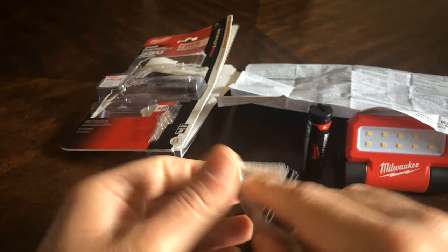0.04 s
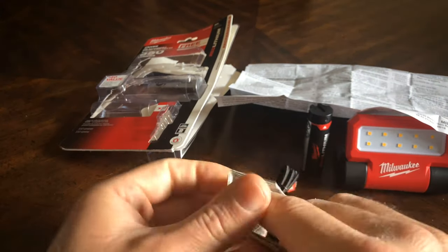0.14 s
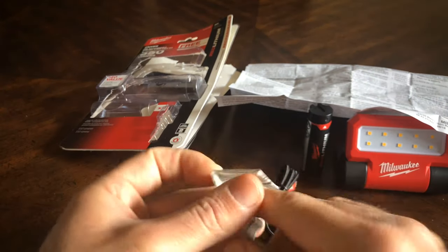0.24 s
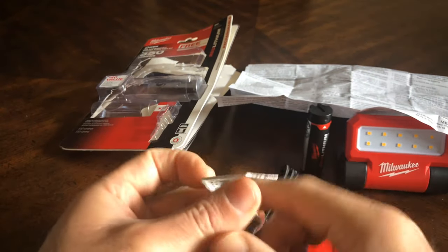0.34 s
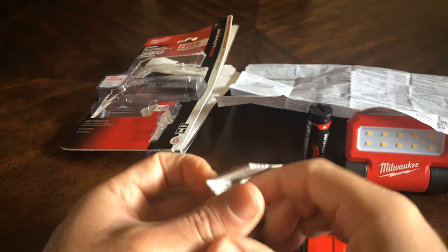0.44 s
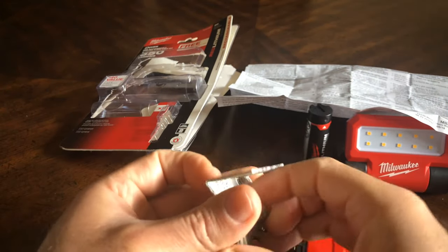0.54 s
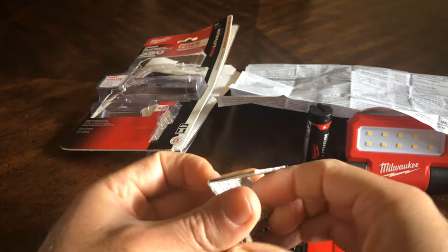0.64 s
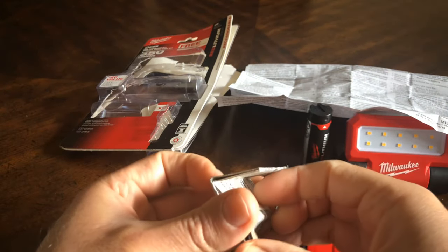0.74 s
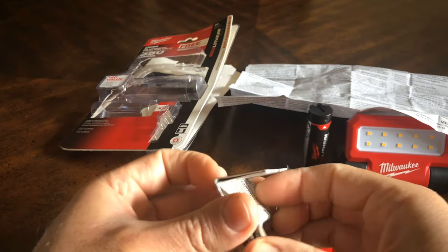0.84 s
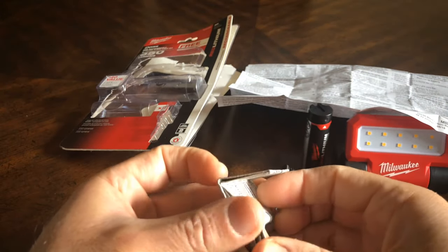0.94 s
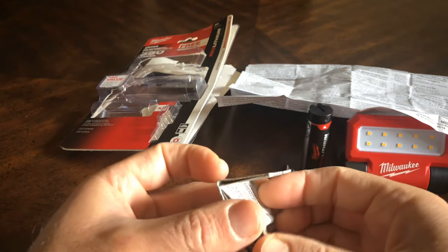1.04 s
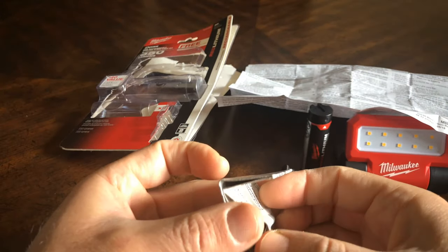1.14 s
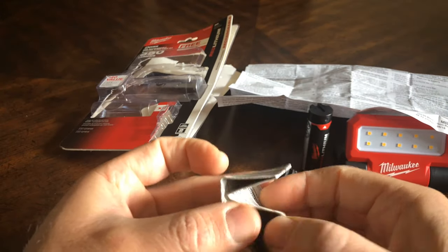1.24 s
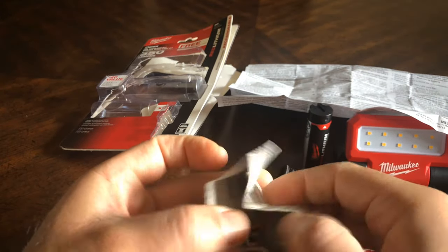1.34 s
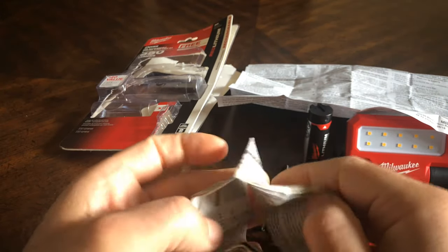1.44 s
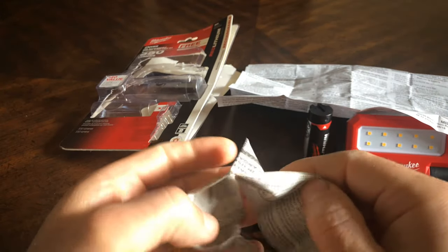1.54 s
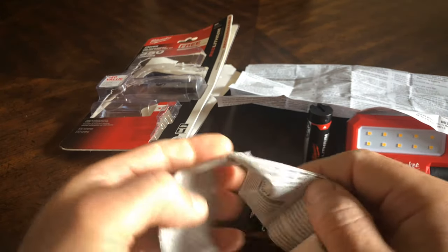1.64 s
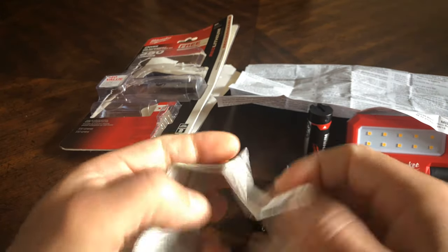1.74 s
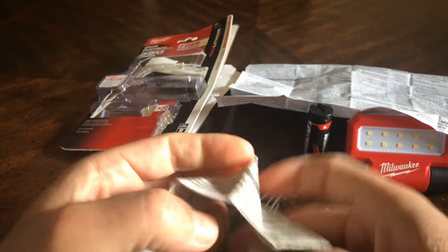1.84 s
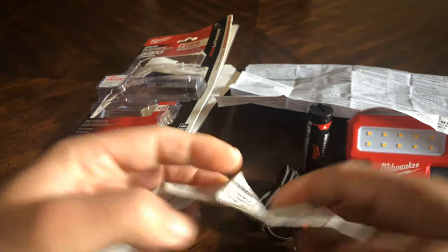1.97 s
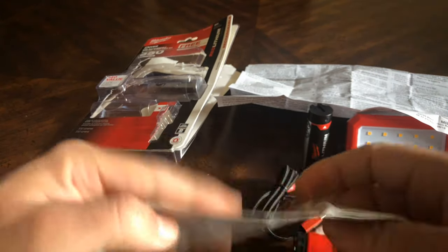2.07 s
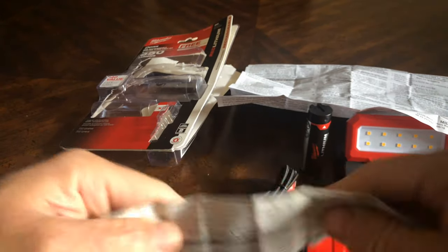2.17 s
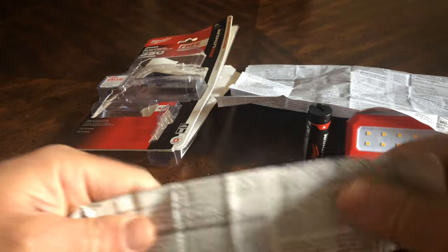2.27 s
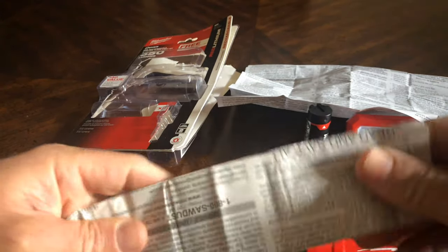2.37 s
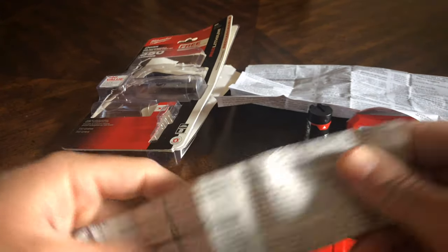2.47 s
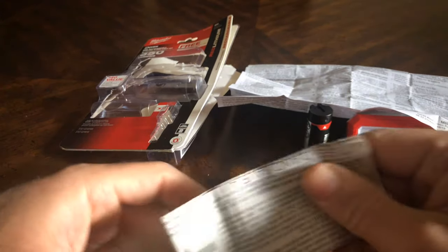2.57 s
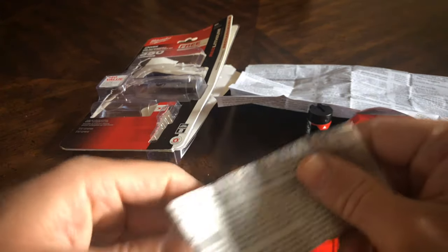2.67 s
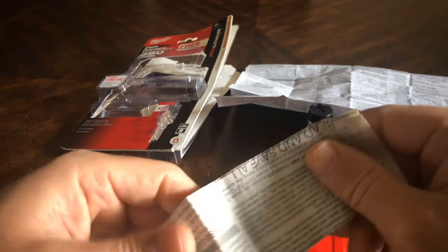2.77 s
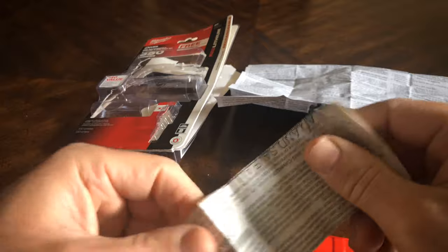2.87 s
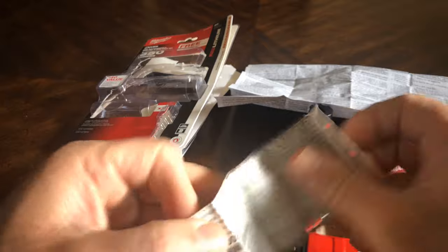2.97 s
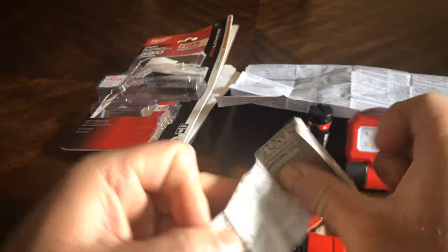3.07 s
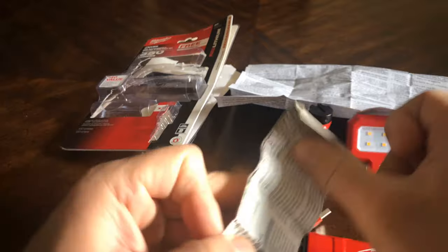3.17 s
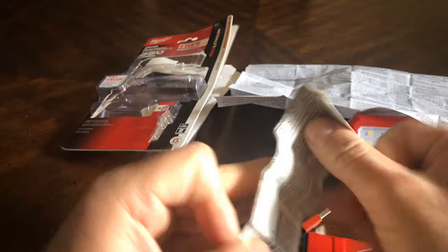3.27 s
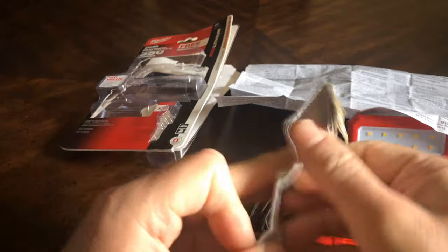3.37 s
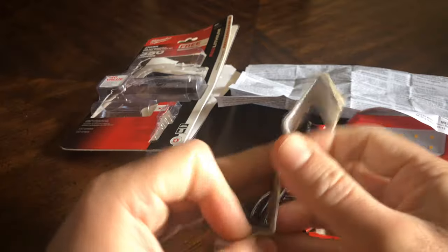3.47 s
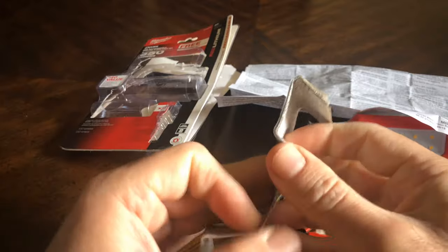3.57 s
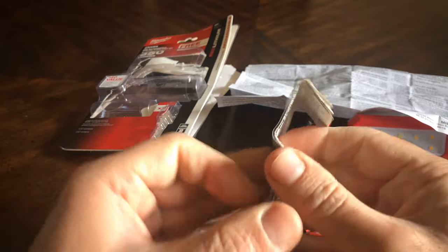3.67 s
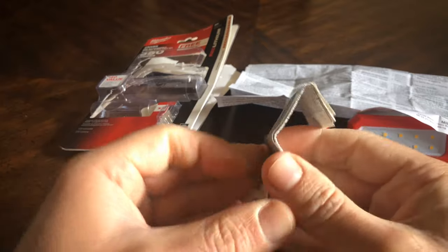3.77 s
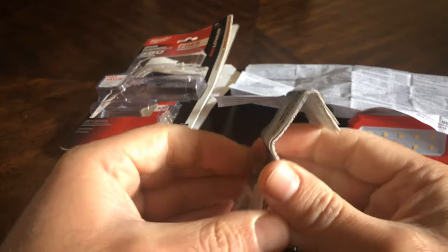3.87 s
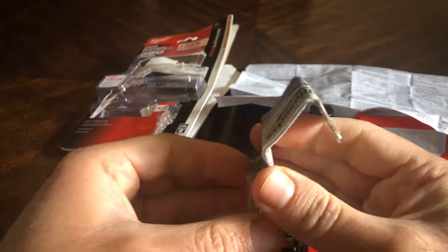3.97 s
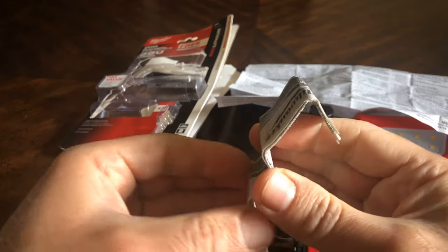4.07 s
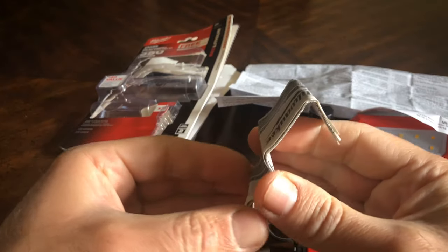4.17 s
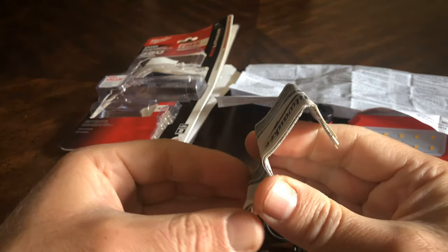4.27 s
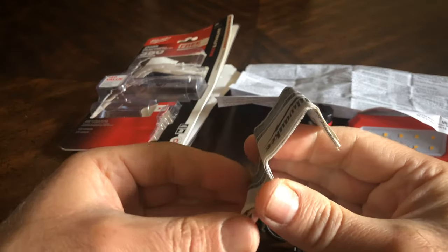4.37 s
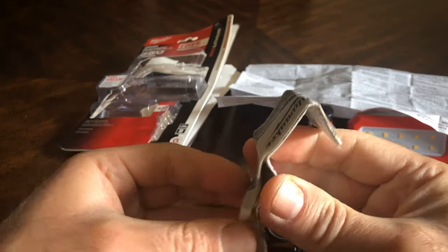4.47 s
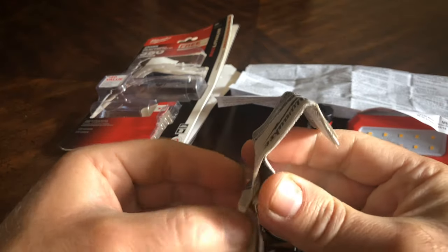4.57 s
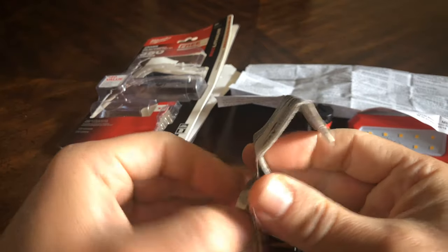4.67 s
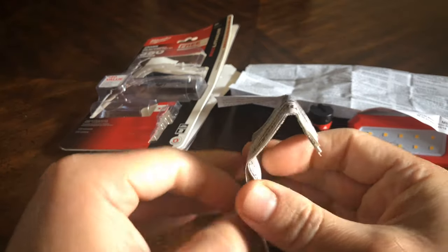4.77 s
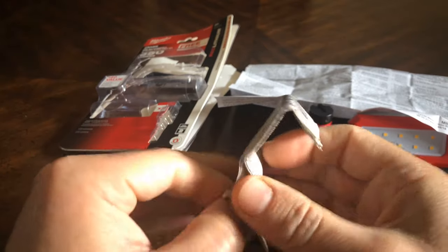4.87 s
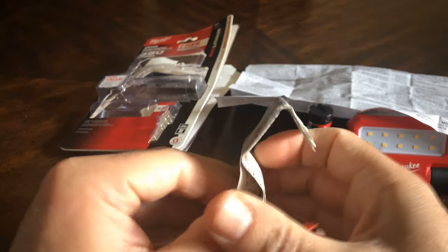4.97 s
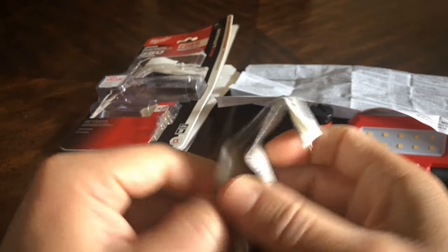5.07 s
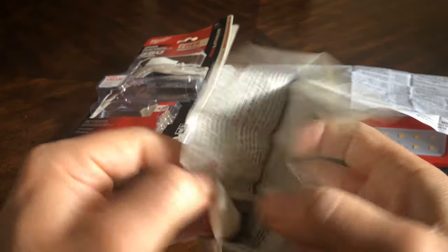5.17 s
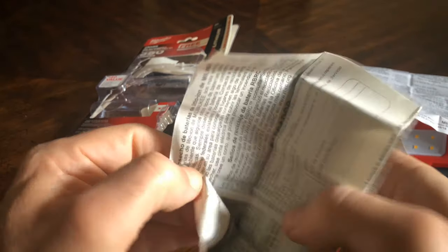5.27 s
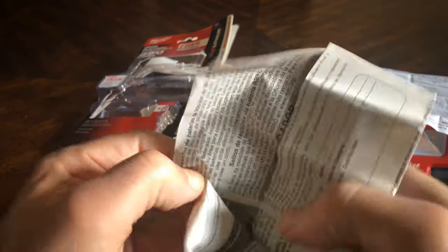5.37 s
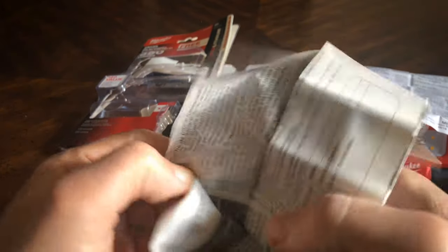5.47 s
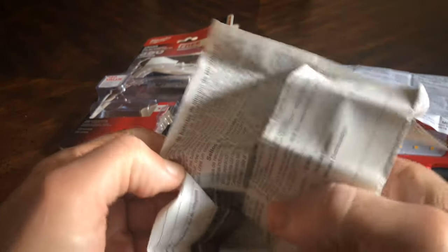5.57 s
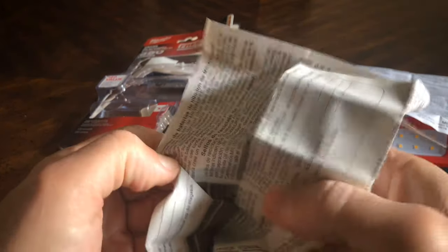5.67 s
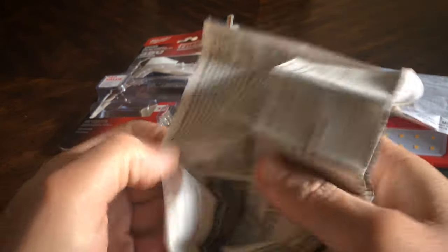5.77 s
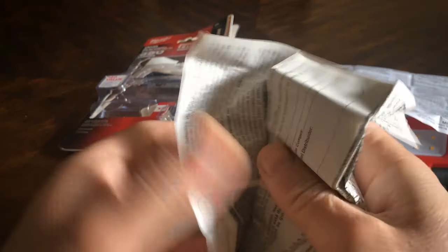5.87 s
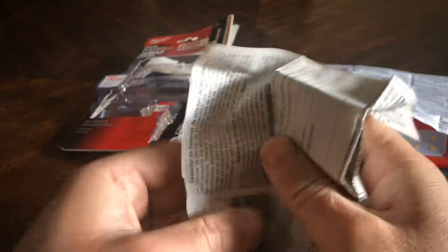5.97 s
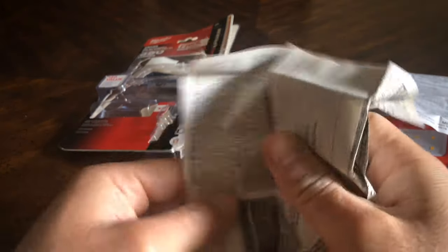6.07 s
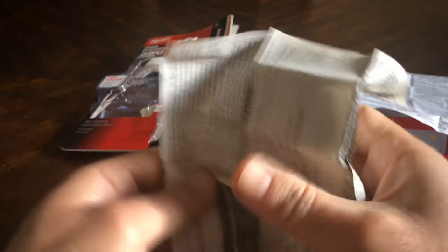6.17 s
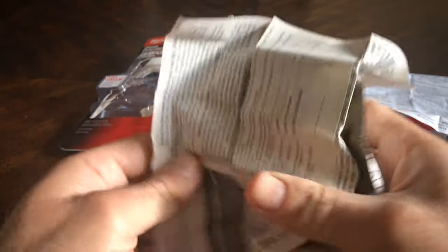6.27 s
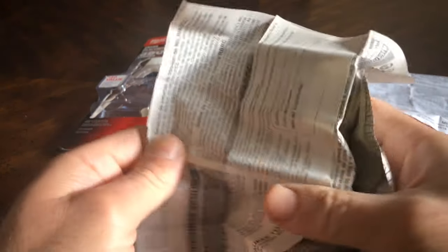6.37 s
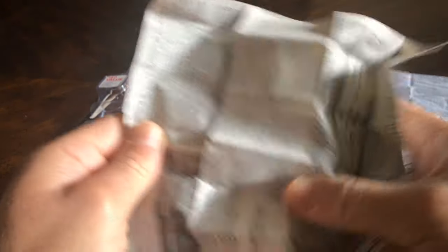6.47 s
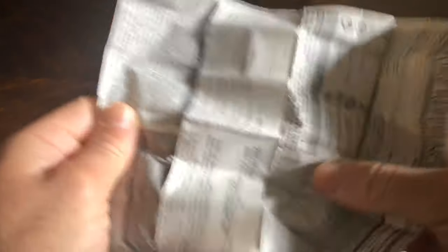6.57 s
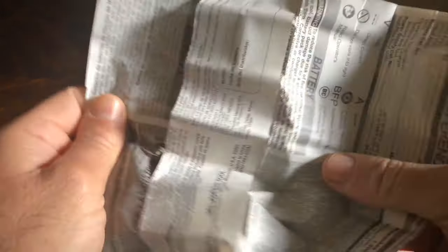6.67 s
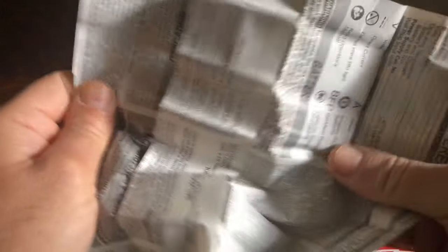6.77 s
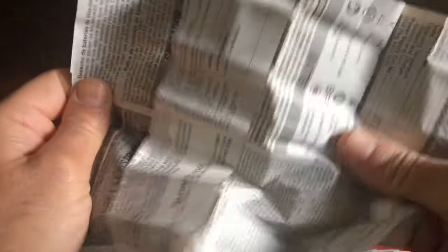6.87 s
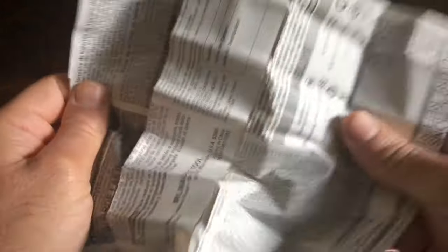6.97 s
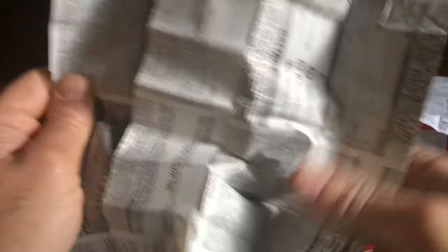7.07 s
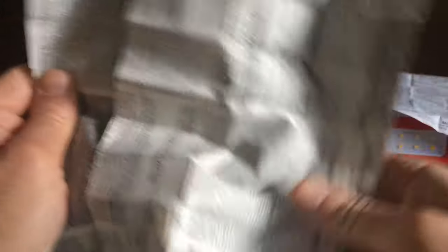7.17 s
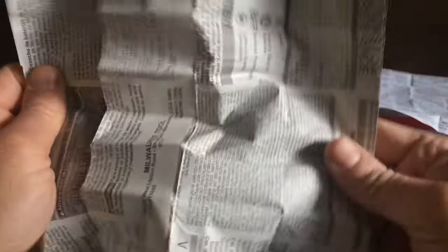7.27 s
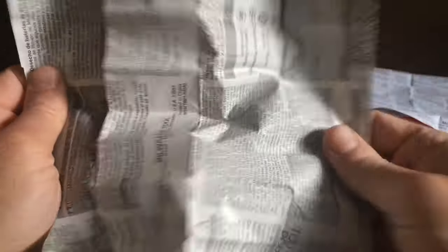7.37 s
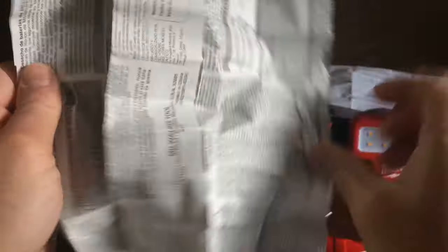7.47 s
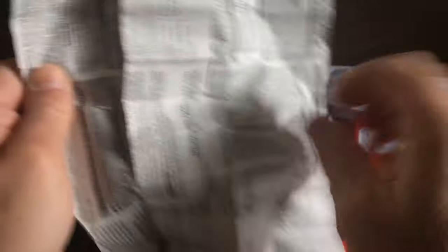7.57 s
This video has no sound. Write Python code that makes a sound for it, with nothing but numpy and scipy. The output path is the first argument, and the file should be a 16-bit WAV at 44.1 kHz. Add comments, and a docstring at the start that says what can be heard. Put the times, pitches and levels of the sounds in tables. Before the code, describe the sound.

A quiet room with a faint, low ventilation murmur, heard through a close small microphone. From 0 to 1.2 s fingers shift a folded thin paper leaflet: faint rubs, small dry ticks and one firmer early snap at 0.2 s. Around 1.3 s creases crackle more clearly, and from 2.0 to 2.7 s a brisk flurry of sharp snaps comes with flopping panels and a soft puff of air. From 2.8 to 4.9 s it is sparser, with occasional clicks and short swishes, slightly hollow between the folded layers. At 5.0 s a strong snap begins the opening; the hollowness fades and the rustle grows fuller. From 5.6 s snaps crowd together with papery flaps and low air thumps, peaking at 6.6 to 6.85 s. Crinkling continues, somewhat lighter and uneven, with another flop at the end near 7.6 s.

```python
"""A folded thin paper leaflet is opened by hand close to a small microphone in a quiet room.
Ventilation murmurs throughout, made of filtered noise; a grainy rustle of hiss and ticks lies over it.
Soon the first creases snap (short noise bursts) and panels flop over (waves of falling pitch).
From about two seconds on, soft lumps of deep noise are the air fanned by hands and sheet.
Around five seconds the leaflet opens and its hollow colour fades; then the snaps crowd together."""
import sys
import numpy as np
from scipy import signal
from scipy.fft import rfft, irfft, next_fast_len
from scipy.io import wavfile
from scipy.ndimage import uniform_filter1d, map_coordinates

SR = 44100
rng = np.random.default_rng(int(sys.argv[2]) if len(sys.argv) > 2 else 0)


def wrap_up_sound(samples):
    """Save the sound to the file named by the first command line argument, as 16-bit audio."""
    columns = np.atleast_2d(samples).T
    # keep every value between -1 and 1, then stretch to whole-number steps
    tamed = np.clip(columns, -1, 1)
    steps = np.round(tamed * 32767).astype(np.int16)
    wavfile.write(sys.argv[1], SR, steps)


N = 335595  # length in samples


def amp(db):
    """Turn decibels into a plain multiplier."""
    return 10 ** (np.asarray(db) / 20)


def unit(x):
    """Scale to an rms of 1."""
    return x / np.sqrt(np.mean(x ** 2, axis=-1, keepdims=True) + 1e-20)


def along(points, hz):
    """Read a curve of (f/Hz, value) points on a logarithmic frequency axis."""
    f, value = np.transpose(points)
    return np.interp(np.log(hz + 1), np.log(f + 1), value)


def over_time(times, values):
    """Join the points with straight lines, one value per sample."""
    return np.interp(np.arange(N) / SR, times, values)


def curves(rows):
    """One curve over time for each column after t/s."""
    times, *columns = np.transpose(rows)
    return [over_time(times, column) for column in columns]


def wobble(rate):
    """A smooth random curve through `rate` random points a second."""
    points = rng.standard_normal(int(N * rate / SR) + 4)
    return map_coordinates(points, [np.arange(N) * rate / SR])


def filtered(x, response):
    """Colour a sound by a function of frequency."""
    size = next_fast_len(N + SR // 2)
    spectrum = rfft(x, size) * response(np.fft.rfftfreq(size, 1 / SR))
    return irfft(spectrum, size)[..., :N]


def resonances(modes, f):
    """A flat response raised or lowered around each (f/Hz, width/Hz, level/dB)."""
    response = 1
    for centre, width, db in modes:
        band = 1j * f * width / (centre * centre - f * f + 1j * f * width)
        response = response + (amp(db) - 1) * band
    return response


def scatter(times, rows):
    """Add each row to one track, starting at its time."""
    at = np.round(times * SR).astype(int)[:, None] + np.arange(rows.shape[1])
    return np.bincount(at.ravel(), rows.ravel(), N + SR)[:N]


def patchy_noise(depth_db, size):
    """Noise of rms 1 whose strength varies in patches of size (170 Hz bins, 3 ms frames)."""
    z = signal.stft(rng.standard_normal(N), nperseg=256)[2]
    field = uniform_filter1d(rng.standard_normal(z.shape), size[0], 0)
    field = uniform_filter1d(field, size[1], 1)
    strength = amp(depth_db * field / field.std())
    return unit(signal.istft(z * strength, nperseg=256)[1][:N])


# Colour of the ventilation noise before its hums: f/Hz, level/dB (per Hz, relative)
MURMUR_COLOUR = [(12, -33), (35, -1), (85, -9.5), (190, -10.5), (300, -9.5), (450, -17), (540, -23),
                 (2500, -31.5), (8000, -36), (13000, -61), (16000, -57)]
# Broad hums in the ventilation: f/Hz, width/Hz, level/dB (lift)
DUCT_HUMS = [(114.5, 5.3, 9.5), (240, 4.2, 10.5), (279, 14, 7.5), (332.5, 33, 11), (435, 26, 8.5)]
MURMUR_DB = -55.5


def murmur():
    """Steady ventilation: noise mostly below 500 Hz, with broad hums where the air resonates."""
    def colour(hz):
        return amp(along(MURMUR_COLOUR, hz)) * resonances(DUCT_HUMS, hz)

    air = filtered(patchy_noise(depth_db=0.5, size=(5, 10)), colour)
    return amp(MURMUR_DB) * unit(air)


# Colour shared by rustle and snaps: f/Hz, level/dB (per Hz, relative)
PAPER_COLOUR = [(88, -16), (150, -9), (341, -1.5), (612, -6), (905, -1), (1390, -4), (3040, -0.5),
                (4950, -6.5), (11500, -3.5), (14800, -9.5), (16000, -15)]


def registers(hz):
    """Split the paper's colour into panel flexing, crease body and sharp edge, each of unit power."""
    low = 1 / (1 + (hz / 1350) ** 7)
    high = 1 / (1 + (5000 / (hz + 1)) ** 4)
    return unit(amp(along(PAPER_COLOUR, hz)) * np.array([low, 1 - low - high, high]))


def bursts(rises, ripple_db):
    """Short noise bursts in three registers; panels swell later and ring longer than the edge."""
    t = np.arange(1024) / SR
    stretch = np.array([1.7, 1, .75])[:, None, None]  # panel, body, edge
    u = np.maximum(t - .003, 0) / (rises[None, :, None] * stretch)  # 3 ms of silence first
    swell = u * np.exp(-u)
    raw = rfft(swell * rng.standard_normal((len(rises), len(t))))
    facets = unit(uniform_filter1d(rng.standard_normal(raw.shape[1:]), size=9))  # a colour for each burst
    colour = registers(np.fft.rfftfreq(len(t), 1 / SR))[:, None]
    parts = irfft(raw * amp(ripple_db * facets) * colour)
    return parts / np.abs(parts).max(-1, keepdims=True)


# Steady grip and shifting of the sheet: t/s, level/dB (rustle body), level/dB (edge, relative to body)
GRIP = [(0, -51.5, -18), (.1, -73.5, -8), (.3, -61, 3), (.58, -69.5, -6), (.95, -70.5, -4),
        (1.4, -62.5, -0.5), (1.85, -59.5, -2), (2.1, -51, 4.5), (2.45, -59.5, -1), (2.75, -66.5, 2),
        (3.5, -66, -1), (3.98, -61.5, -8), (4.12, -73.5, 3), (4.33, -74, -8), (4.5, -54, -4.5),
        (4.95, -65.5, -3.5), (5.05, -52.5, -7.5), (5.6, -54, -2.5), (6.1, -48, -4), (6.8, -42.5, -1),
        (7.05, -55, -2.5), (7.3, -46.5, 0), (7.61, -55, -9)]
# Swishes of a finger or layer across the paper:
# t/s (peak), level/dB (peak), length/s, level/dB (edge, relative to peak)
STROKES = [(0.167, -59.5, 0.046, 1), (0.238, -49.5, 0.048, 3), (0.353, -60.5, 0.015, 9),
           (0.737, -58.5, 0.13, -6), (0.805, -55.5, 0.073, 4), (1.035, -52.5, 0.028, 4),
           (1.182, -59.5, 0.075, 2), (1.324, -48, 0.14, -5), (1.534, -44.5, 0.068, -1.5),
           (1.717, -54.5, .07, 3), (1.989, -45.5, 0.14, -1), (2.222, -59, 0.091, 19),
           (2.642, -74, 0.051, 1), (2.826, -72.5, 0.11, 15), (2.94, -56.5, 0.1, 2), (3.033, -57, 0.062, -1),
           (3.254, -57.5, 0.21, 3), (3.445, -51.5, 0.12, -1.5), (3.727, -51, 0.042, -5),
           (3.883, -44, 0.037, 0), (4.417, -40.5, 0.048, -1.5), (4.66, -53, 0.099, 3),
           (4.786, -42.5, 0.04, -0.5), (5.14, -45.5, 0.053, 3), (5.255, -42.5, 0.014, 4.5),
           (5.458, -41.5, 0.027, 3), (5.71, -41.5, 0.12, 2), (5.806, -39.5, 0.023, 2),
           (5.997, -35, 0.028, -4), (6.107, -38.5, 0.042, -2), (6.27, -43.5, 0.035, 5),
           (6.415, -36.5, 0.027, -2), (6.522, -37, 0.062, -0.5), (6.67, -41.5, 0.035, 2),
           (6.837, -33.5, 0.048, -0.5), (7.209, -31, 0.058, -6), (7.372, -41, 0.082, -2.5),
           (7.607, -39, .04, -6)]
FADE_DB, RISE_SHARE = 16.5, 0.78  # fall of a stroke over its length; its rise is this share as long


def handling():
    """Level of the rustle body and its relative edge in dB: swishes add power to the steady grip."""
    coarse = np.arange(0, N, 64)  # work on every 64th sample
    peak, db, length, edge_db = np.array(STROKES).T[..., None]
    late = (coarse / SR - peak) / np.maximum(length, .01)
    distance = np.where(late < 0, -late / RISE_SHARE, late)
    swish = amp(db - FADE_DB * distance)

    def fine(values):
        return np.interp(np.arange(N), coarse, values)

    grip, grip_edge = amp(curves(GRIP))
    body = grip ** 2 + fine((swish ** 2).sum(0))
    edge = (grip * grip_edge) ** 2 + fine(((swish * amp(edge_db)) ** 2).sum(0))
    return 10 * np.log10(body), 10 * np.log10(edge / body)


# The sheet goes from folded to open between these two moments: t/s (start), t/s (end)
OPENED = (4.7, 5.2)
PANEL_FOLDED_DB, PANEL_OPEN_DB = -6, 2  # panel level relative to body; the open sheet flexes more


def rustle():
    """Sliding fibres hiss in shifting narrow bands, and tiny creases tick in clumps on top."""
    db, edge_db = handling()
    panel_db = over_time(OPENED, [PANEL_FOLDED_DB, PANEL_OPEN_DB])
    clump = wobble(45)

    draw = rng.random((2500, 6))  # one row per tick
    times = draw[:, 0] * (N - 1) / SR
    size_db = -6 * np.log(draw[:, 1]) + 3.1 * clump[(times * SR).astype(int)]
    size_db = np.minimum(size_db, 14)  # the big creases are the snaps
    tilt_db = 14 * draw[:, 3:].T  # some ticks are dull, some sharp
    grains = bursts(0.00013 + 0.001 * draw[:, 2], ripple_db=2.5)
    tracks = [scatter(times, amp(size_db + tilt)[:, None] * grain) for tilt, grain in zip(tilt_db, grains)]
    ticks = unit(np.array(tracks))

    flicker = amp(.9 * clump + 2.2 * wobble(120))
    fibres = flicker * patchy_noise(depth_db=2.4, size=(3, 22))
    hiss = filtered(unit(fibres), registers)

    grit = np.clip(0.68 + 0.014 * (db + 38), .2, .9)  # harder handling crackles more than it hisses
    layers = grit * ticks + np.sqrt(1 - grit ** 2) * hiss
    gains = amp(db + np.array([panel_db, 0 * db, edge_db]))
    return (gains * layers).sum(0)


# Creases that buckle: t/s, level/dB (body peak), level/dB (panel, relative), level/dB (edge, relative)
SNAPS = [(0.2151, -28.5, -10, 3), (0.3496, -42, -23, -11), (0.5342, -48.5, -10, -28),
         (0.717, -35.5, -26, -6), (0.7227, -42.5, -24, 5), (0.7678, -41, -23, 9), (0.8294, -47, -17, 5),
         (0.8438, -45, -21, 12.5), (0.8585, -49, -16, 8), (1.0094, -37, -27, -2),
         (1.0297, -40.5, -30, 12.5), (1.054, -44.5, -20, 10), (1.2632, -40, -10, 10),
         (1.2938, -24.5, -5, -13), (1.3514, -30, -8, -11), (1.3773, -34, -6, -15), (1.509, -30.5, -4.5, 3),
         (1.5853, -33, -10, 3.5), (1.6344, -45.5, -14, 10), (1.8417, -38.5, -18, -8),
         (1.8721, -30.5, -14, 1.5), (1.9871, -19, -35, -9), (2.0024, -31, -19, -4), (2.0132, -30, -15, 8),
         (2.024, -31, -13, 3), (2.0336, -24, -23, -4), (2.0467, -27, -20, 5), (2.1124, -22.5, -17, 3.5),
         (2.2226, -25.5, -7.5, -6), (2.2411, -26, -14, 9.5), (2.2545, -20, -12, -4), (2.293, -30.5, -19, 0),
         (2.3388, -36, -9, -13), (2.447, -36.5, 0.5, -12), (2.5044, -38, -18, -15), (2.5721, -40, -8, -27),
         (2.61, -23.5, -27, 3), (2.6444, -32.5, -37, -5), (2.6567, -36, -28, -16), (2.834, -38.5, 1.5, -14),
         (3.1027, -30.5, -6, -22), (3.1991, -24, -1.5, 2.5), (3.265, -38, -1, -6),
         (3.3274, -47.5, 10.5, -6), (3.4223, -32, -12, -4), (3.5412, -38, -24, -15), (3.598, -42, -16, -26),
         (3.9105, -36, -19, 1), (4.4337, -26.5, -28, -26), (4.4529, -33, -5, -11), (4.566, -29.5, -8, -30),
         (4.5999, -35, -12, -11), (4.875, -45, -8, -6), (4.9892, -18.5, -12, -12), (5.1063, -26.5, -25, 12),
         (5.1338, -29.5, -18, -15), (5.1505, -29, -4, -11), (5.246, -36, -1, 3), (5.2545, -27, -2, -8),
         (5.3118, -21.5, -9, -18), (5.458, -26, -25, -9), (5.591, -17.5, -2.5, -9), (5.641, -26, -6, -16),
         (5.6544, -17.5, -21, -4), (5.7054, -19.5, -5.5, 0), (5.777, -25.5, -3, -13),
         (5.7947, -21.5, -10, -10), (5.8058, -26, -15, 9), (5.887, -19, -23, -9), (5.8982, -20, -7, -5),
         (5.9114, -26, -17, -4), (5.9312, -31.5, -18, 5), (5.9555, -22, -6, -18), (5.9877, -23, -11, -7),
         (5.9992, -17.5, -6.5, 0), (6.0348, -16.5, -9, -6), (6.0758, -28, -4, -16), (6.1043, -26, 7.5, -12),
         (6.114, -20.5, -18, -5), (6.1624, -19.5, 0, -5), (6.1763, -23, -1, -10), (6.2095, -13.5, -10, -17),
         (6.225, -28, -22, 6), (6.2308, -22, -8, 2.5), (6.2522, -17.5, -16, 0), (6.2615, -24.5, -5, -7),
         (6.276, -17, 0, -2.5), (6.3198, -19, -7, -10), (6.357, -27, -6, -22), (6.3678, -22.5, 4, -18),
         (6.4218, -21, -4.5, -8), (6.4328, -21.5, -5, -3), (6.4824, -39, -10, -5), (6.4919, -19.5, -9, -1),
         (6.5114, -23.5, -17, -7), (6.5304, -23, -11, -2), (6.553, -20, -8, -1), (6.575, -19, -17, -20),
         (6.5808, -18, -22, -5), (6.6351, -7.5, -36, -13), (6.6635, -12, -15, -1), (6.72, -17.5, -7, -2),
         (6.7456, -15.5, -13, -6), (6.7506, -11.5, -25, -13), (6.771, -20.5, -11, -7),
         (6.7953, -19.5, -28, -11), (6.8156, -17, -16, -5), (6.831, -11.5, -10, -7.5),
         (6.847, -21, -5, -17), (6.903, -28, -0.5, -19), (6.9252, -28, -1.5, -12), (6.9506, -18, -15, -7),
         (7.0347, -34, -13, -21), (7.0646, -21.5, -11, -31), (7.1373, -23.5, -13, -12),
         (7.1495, -22.5, -12, 0.5), (7.171, -19, 1.5, -24), (7.1967, -25, -3, 0), (7.2124, -18.5, -6, -1),
         (7.236, -23, -13, -8), (7.2691, -22.5, -3, -1), (7.2754, -24, -9, -2), (7.3205, -25.5, -3, -21),
         (7.3432, -17, -2.5, -2.5), (7.354, -25, 1, -12), (7.5223, -28, -18, -10), (7.5299, -24.5, -20, -4),
         (7.5562, -33.5, -3, 6.5), (7.5898, -29.5, 8.5, 11), (7.6034, -27, -4, -1)]
RISE_MS, RISE_SCATTER = .85, .2  # usual rise of a snap's body; log spread from crease to crease


def snaps():
    """Each crease lets go in a burst of a few milliseconds."""
    times, db, panel_db, edge_db = np.transpose(SNAPS)
    gains = amp(db + np.array([panel_db, 0 * db, edge_db]))
    rises = RISE_MS / 1000 * np.exp(RISE_SCATTER * rng.standard_normal(len(times)))
    clicks = (gains[..., None] * bursts(rises, ripple_db=3)).sum(0)
    return scatter(times - .003, clicks)  # makes up for the silence that starts each burst


# Air pocket between the folded layers, a dip below a lift: f/Hz, width/Hz, level/dB
POCKET = [(1350, 310, -2), (1860, 133, 3.5)]


def air_pocket(bare):
    """The air between folded layers colours the paper; the colour fades as the sheet opens."""
    folded = over_time(OPENED, [1, 0])
    hollow = filtered(bare, lambda hz: resonances(POCKET, hz))
    return folded * hollow + (1 - folded) * bare


# Whole panels flipping over: t/s (start), level/dB (peak), f/Hz (pitch passed on the way down)
FLOPS = [(0.256, -45, 150), (2.047, -33.5, 328), (2.113, -31, 365), (2.225, -37.5, 345), (2.915, -46, 130),
         (3.223, -35.5, 310), (3.421, -37, 337), (5.644, -22.5, 374), (5.656, -28, 294), (6.08, -27, 390),
         (6.274, -31.5, 340), (6.497, -31.5, 100), (6.826, -26, 467), (7.1, -39, 156), (7.171, -36, 214),
         (7.591, -26, 453)]


def flops():
    """A bending wave crosses the panel: short ripples arrive first, so the pitch falls."""
    times, db, hz = np.transpose(FLOPS)
    cycles = hz[:, None] * np.arange(SR // 8) / SR
    u = cycles / 1.08  # the swell lasts about two cycles
    swell = (u * np.exp(1 - u)) ** 3
    wave = np.sin(2 * np.pi * 3.55 * np.log(1 + cycles / 2.24))
    return scatter(times, amp(db)[:, None] * swell * wave)


# Air moved by hands and sheet: t/s, level/dB
FAN = [(1.6, -90), (2.1, -47), (2.5, -73), (4.9, -66), (5.3, -53.5), (5.46, -46), (5.55, -60),
       (5.67, -50.5), (6.12, -51), (6.45, -48), (6.52, -40), (6.62, -46), (7.08, -55.5), (7.12, -47),
       (7.35, -55), (7.61, -54)]
# Colour of the moved air: f/Hz, level/dB (per Hz, relative)
PUFF_COLOUR = [(15, -4), (60, -4), (200, -6), (500, -33)]


def fan():
    """Moving hands and sheet push soft lumps of air past the microphone."""
    db, = curves(FAN)
    air = filtered(rng.standard_normal(N), lambda hz: amp(along(PUFF_COLOUR, hz)))
    lumps = amp(4.3 * wobble(25))
    return amp(db) * unit(lumps * air)


# How long the room's answer takes to fall by 60 dB: f/Hz, time/s
ROOM_DECAY = [(200, 0.84), (2000, 1), (10000, 0.14)]


def room(x):
    """Each frequency of the room's answer dies at its own speed."""
    hz, t, z = signal.stft(rng.standard_normal(SR // 2), SR, nperseg=256)
    decay = amp(-60 * t / along(ROOM_DECAY, hz)[:, None])
    tail = signal.istft(z * decay, SR, nperseg=256)[1]
    delayed = np.pad(x, (200, 0))  # in samples
    return signal.fftconvolve(delayed, tail / np.linalg.norm(tail))[:N]


def scene():
    """Paper with its quiet echo, over fanned air and ventilation."""
    background = murmur()
    paper = air_pocket(rustle() + snaps()) + flops()
    return (paper + amp(-18.5) * room(paper) + fan() + background)[None]


# Microphone port resonances: f/Hz, width/Hz, level/dB (lift)
PORT = [(3115, 490, 3), (5930, 1080, 4)]
TOP_HZ = 16000  # upper band limit


def record(dry):
    """The microphone port lifts two bands; the top is cut steeply at the band limit."""
    def response(hz):
        top_cut = (hz < 16650) / (1 + (hz / TOP_HZ) ** 120)
        return resonances(PORT, hz) * top_cut

    return filtered(dry, response)


dry = scene()
out = record(dry)
wrap_up_sound(out)
```